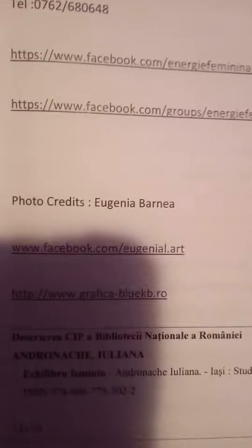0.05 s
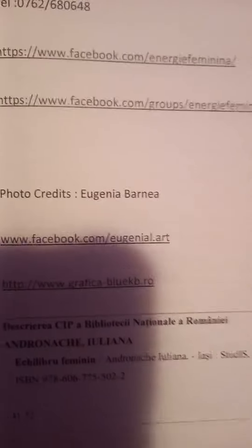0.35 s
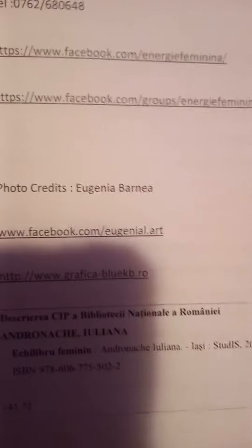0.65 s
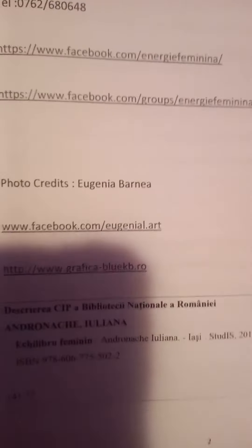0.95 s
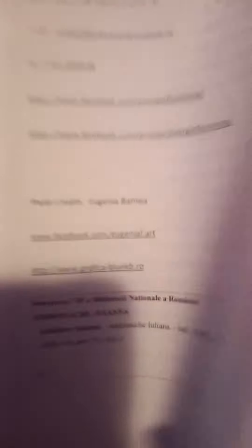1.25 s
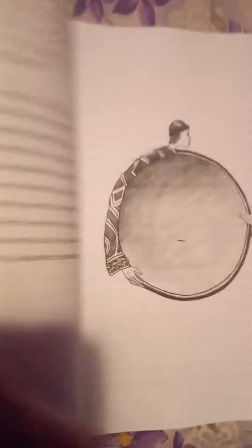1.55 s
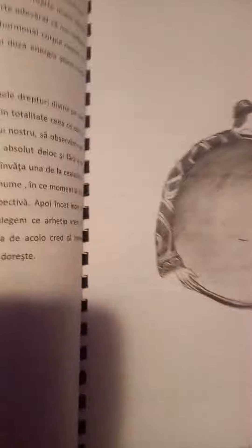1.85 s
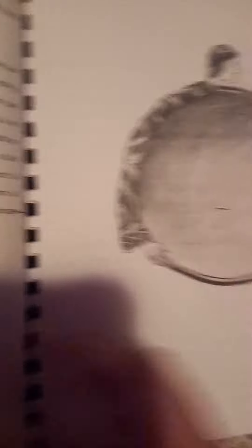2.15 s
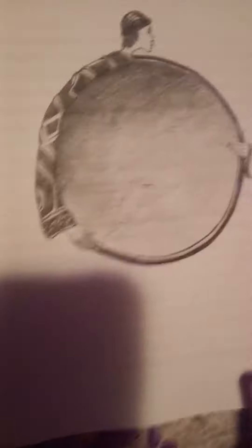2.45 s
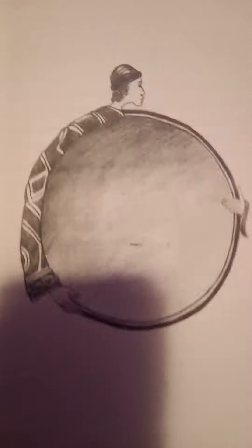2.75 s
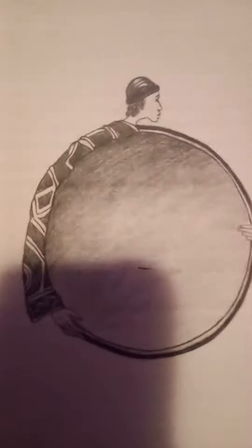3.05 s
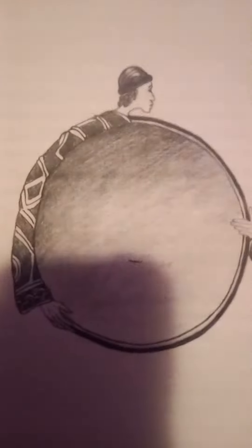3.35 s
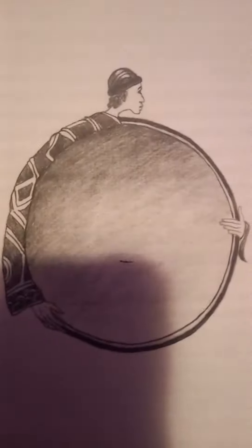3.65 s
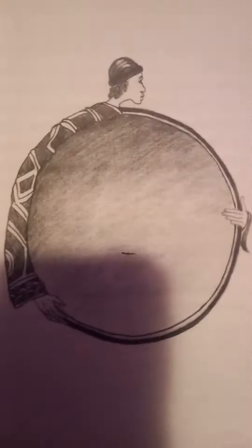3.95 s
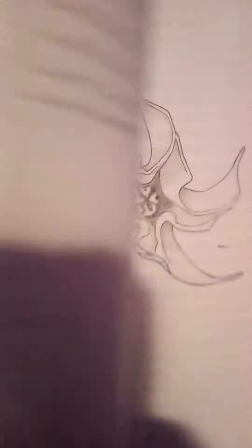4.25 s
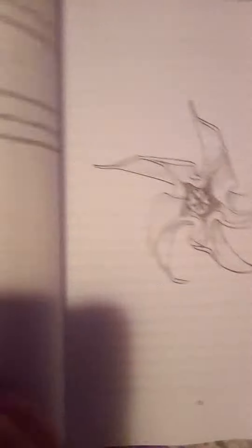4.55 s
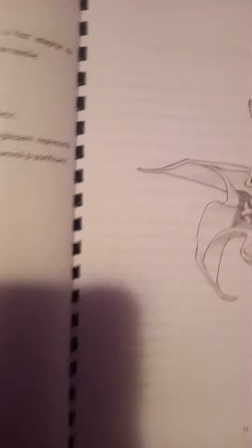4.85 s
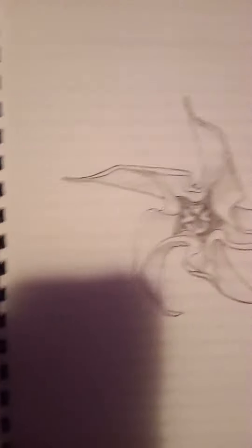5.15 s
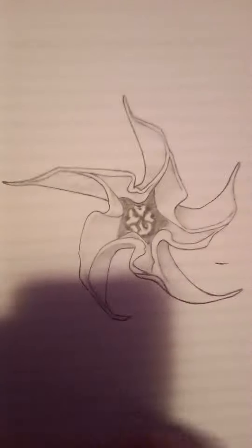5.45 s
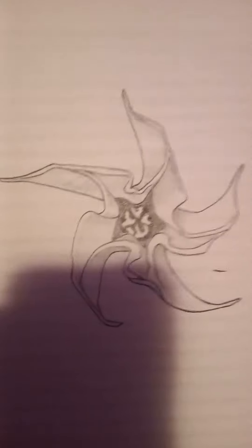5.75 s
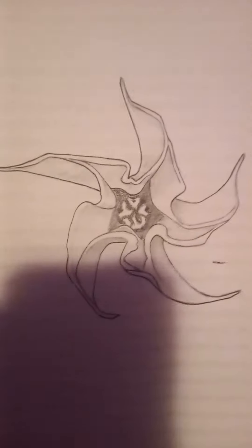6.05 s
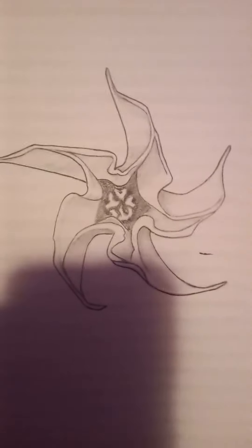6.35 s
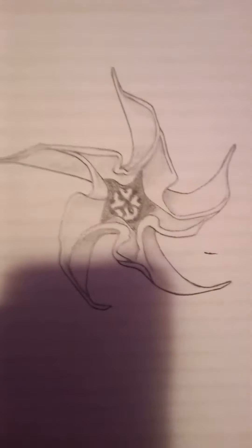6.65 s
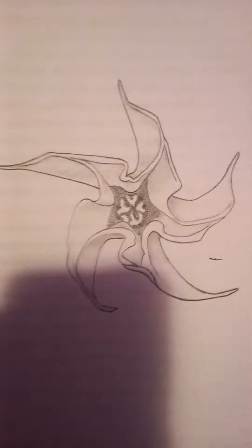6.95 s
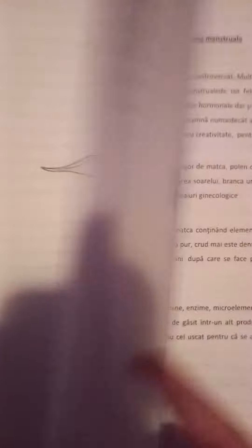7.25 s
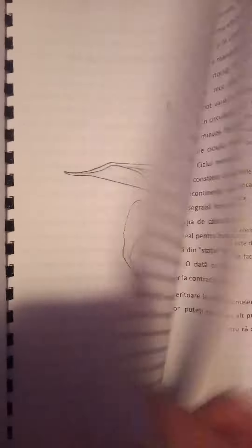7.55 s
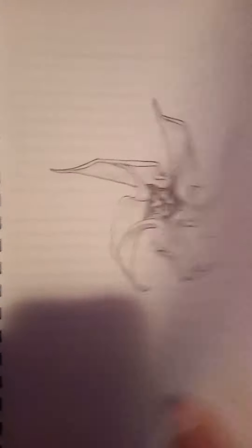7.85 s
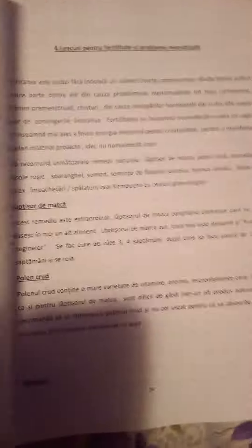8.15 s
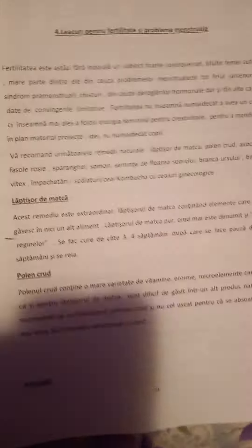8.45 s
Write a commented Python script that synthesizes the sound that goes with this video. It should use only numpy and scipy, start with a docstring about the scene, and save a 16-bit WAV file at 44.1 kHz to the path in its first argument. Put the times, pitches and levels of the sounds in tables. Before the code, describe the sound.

Close rustles, crisp snaps and soft bumps as someone leafs through a bound book in a quiet room, pausing twice.

```python
"""Turning the pages of a comb-bound book

Pages are turned by hand, close to a phone in a small quiet room. Stick-slip friction makes each sheet
hiss as it slides and swish as it bends; it snaps where it buckles or catches on the binding. The air
gap beneath it resonates, and it settles on a cushion of air. Hand and sheet bump the book softly,
exciting its damped modes. Room air, microphone hiss and the hum of a distant appliance lie behind."""
import sys
import numpy as np
from scipy import signal
from scipy.fft import rfft, irfft
from scipy.io import wavfile
from scipy.ndimage import uniform_filter1d, map_coordinates

SR = 44100
rng = np.random.default_rng(int(sys.argv[2]) if len(sys.argv) > 2 else 0)


def store_pcm(level_fs):
    """Save levels as 16-bit WAV."""
    pcm = np.round(np.clip(level_fs, -1, 1) * 32767).astype(np.int16)
    wavfile.write(sys.argv[1], SR, np.atleast_2d(pcm).T)


N = 374850
T = np.arange(N) / SR

# Sliding sheet, one curve a turn: t/s, rubbing level/dB, bend/dB (body that the curved sheet adds)
TURN_CURVES = ([(.55, -50.5, -5), (.68, -49.5, 7), (.78, -51, -1.5), (1.02, -35, -9.5), (1.19, -35, 2),
               (1.28, -42, -0.5), (1.58, -41.5, -4), (1.72, -34.5, 3), (1.86, -35, -7), (1.97, -34, -3.5),
               (2.13, -41, -7), (2.2, -62, 0)], [(3.94, -47.5, -6), (4.02, -42, -5), (4.13, -32.5, -9.5),
               (4.29, -48, -5.5), (4.44, -53.5, 1.5), (4.5, -37.5, -0.5), (4.72, -33, 3), (5.08, -37, -7.5),
               (5.16, -37.5, 1), (5.24, -46, -14), (5.32, -66, -2)], [(6.63, -49, 7), (6.71, -37, -14.5),
               (6.92, -35, -8), (7.11, -30.5, -8), (7.225, -40, -6), (7.28, -27.5, 0.5), (7.52, -35, -2.5)],
               [(7.53, -30.5, -25), (7.62, -31.5, 1), (7.72, -34.5, -7), (7.95, -32.5, -5),
               (8.09, -39.5, -22.5), (8.19, -36.5, 0), (8.387, -33, -3), (8.41, -29.5, 0.5),
               (8.49, -28.5, -9)])
# Quick rubs on paper or skin: t/s of the crest, length/s, level/dB, body/dB, edge/dB
QUICK_RUBS = [(0.255, .1, -50.5, 15.5, -4.5), (0.647, 0.017, -28, -4, 4), (0.933, 0.015, -32.5, 2, -7),
              (.975, 0.017, -28, 6, -3), (1.053, 0.064, -30.5, -21, 7), (1.136, 0.023, -21.5, 5, -1),
              (1.181, 0.038, -23, -4, -27), (1.343, 0.034, -30, 7.5, -5.5), (1.757, .036, -28.5, 9, 1),
              (1.9, 0.028, -20.5, 0, -8), (1.957, .032, -17.5, 10.5, -2.5), (2.28, 0.093, -51, -11, -0.5),
              (3.3, .05, -51, 13, 2), (3.509, 0.072, -51, 13.5, -5), (4.021, 0.034, -20.5, 1.5, 4),
              (4.357, .04, -34, -8, -3), (4.619, 0.037, -29.5, 2, -11), (4.722, 0.023, -24, 1, -7),
              (4.758, 0.026, -19, 2, -1), (4.81, 0.015, -17, 0.5, 1.5), (5.121, 0.028, -25, -7.5, -4.5),
              (6.708, 0.03, -20.5, 2, 2), (6.846, 0.024, -21.5, 7.5, 2.5), (6.978, .02, -20.5, -3, -11.5),
              (7.074, 0.046, -22.5, 4, 0), (7.134, 0.024, -19.5, 6, 7.5), (7.315, 0.021, -15, 3, -2.5),
              (7.345, 0.014, -16, -3, -5.5), (7.387, .042, -23.5, -11, -1), (7.43, .02, -21, -1, -2),
              (7.603, .02, -15, -2, -6.5), (7.782, .02, -21.5, -6, -5.5), (7.896, 0.034, -34, -3, -4),
              (7.961, .03, -27.5, 2.5, 4.5), (8.416, .016, -15, -13, -6), (8.44, 0.022, -12.5, -10.5, -7)]
# Buckles and catches: t/s, level/dB, body/dB, edge/dB, left minus right/dB
BUCKLES = [(.529, -27, 0, 3, 12), (.551, -8.5, -15, 16, 12), (0.556, -18, -20, 10, 5),
           (.563, -9.5, -10, 1, 10), (0.624, -10.5, -21, 4, 10), (0.629, -10, -3, 11, 14),
           (0.646, -8.5, -20, 7, 12), (.654, -10, -20, 13, 7), (.662, -4, -3, 7.5, 11),
           (0.812, -19.5, 0, -5, 1), (.85, -10, -5, -6, 3), (.857, -7, -8.5, -0.5, -1),
           (.868, -3, -4.5, 0, -1), (1.009, 0.5, 1.5, 1.5, -0.5), (1.16, 2, 1, -12, -0.5),
           (1.615, -8.5, 10.5, -3, 1), (1.648, -12, 16, -2, 8.5), (1.678, -7, 8.5, -6, 2),
           (1.717, 4, 6, 2.5, 8.5), (1.887, -0.5, 1, 8, 20), (1.927, -1.5, 9, 8, 3), (2.008, -13, 8, -1, 4),
           (2.06, -13, -7, 8, 14), (2.081, -8, -21, -13.5, 2), (2.102, -14.5, 5.5, -14, 5),
           (2.806, -24, -15, -3, -1), (2.839, -30.5, 6, -15, 2.5), (3.647, -24.5, -10, -13, 3),
           (3.918, -22.5, -12, -2, -1), (3.959, -12, -7.5, -4, -2), (3.97, -10, -13, -1.5, 0),
           (4.104, -2, 7, -5.5, 1), (4.47, -12, -7, 5, 1), (4.524, -4, -4.5, 2, 8),
           (4.564, -2.5, 3.5, -4, 3.5), (4.61, 2, 14, -0.5, 2), (4.694, -6.5, -12, -9, 6),
           (4.72, -0.5, -11, 4, 12), (4.805, -10, 0, 0, -10), (4.856, -8.5, 3.5, 5, 10),
           (4.896, -7.5, -32, -5, 3), (6.472, -32.5, -7, -4, 3), (6.623, -23, -15.5, -3, -1),
           (6.811, -13, 4.5, -1, -1), (6.836, -2, -1, 1, -3), (7.145, -10, -7, 6, 2),
           (7.244, -8.5, -4, -2, -1), (7.257, -7.5, 7, -2, 3), (7.428, -5.5, 3.5, -6, -1),
           (7.593, -12, -8, -5, 7), (7.761, -9.5, 13, -9, 1), (8.203, -11.5, 0, -9, 3),
           (8.228, -0.5, 9.5, 5, 4.5), (8.276, -3, 2, 0.5, 6), (8.335, -0.5, 4.5, 3.5, 8),
           (8.389, -2.5, -23, -10, 2), (8.443, -3, -11, 0, 3)]
# Air gap under a lifting or falling sheet: t/s, length/s, level/dB, first f/Hz, last f/Hz, width/octaves
AIR_GAPS = [(1.156, 0.16, -40, 1510, 1460, .23), (1.708, 0.062, -24.5, 1410, 1650, 0.12),
            (1.907, 0.055, -25.5, 1500, 350, .34), (4.106, 0.032, -31, 546, 296, 0.16),
            (4.318, 0.13, -40.5, 2300, 1700, .2), (4.466, .2, -32, 1850, 1570, .22),
            (4.905, 0.18, -36.5, 1900, 2150, 0.13), (5.123, .03, -28, 2800, 400, 0.45),
            (6.697, 0.5, -34.5, 2220, 2500, 0.17), (6.685, 0.21, -40, 3300, 3030, 0.044),
            (7.04, 0.14, -27.5, 1610, 1440, 0.15), (7.261, 0.3, -33, 1380, 1250, 0.42),
            (7.33, 0.036, -23.5, 1900, 1890, .052), (7.757, .01, -30, 700, 525, 0.44),
            (8.435, 0.063, -26.5, 3620, 3760, 0.1)]
# Soft impacts on the book: t/s, level/dB, upper cutoff f/Hz of the contact
IMPACTS = [(0.149, -31.5, 400), (.665, -22, 400), (0.834, -25, 400), (.895, -23, 400), (1.13, -16, 201),
           (1.158, -15, 300), (1.717, -24, 300), (1.92, -21, 300), (1.951, -15, 400), (2.519, -43, 200),
           (2.838, -40, 400), (4.012, -23, 300), (4.106, -12, 600), (4.118, -12, 450), (4.61, -15, 600),
           (4.82, -25, 200), (5.141, -18.5, 303), (6.485, -33.5, 202), (6.722, -21, 400), (6.848, -19, 700),
           (7.013, -14, 395), (7.26, -17.5, 201), (7.304, -20, 250), (7.677, -20.5, 179),
           (7.761, -16.5, 500), (7.776, -19, 161), (7.841, -26, 180), (7.957, -21, 170), (8.228, -18, 500)]
# Modes of the block of pages on its support: f/Hz, level/dB, t60/s
BOOK_MODES = [(82, -9, .07), (118, -3, .08), (165, -2, .06), (236, -2, .07), (290, -1, .06), (360, 0, .06),
              (450, -2, .05), (620, -7, .04)]
# Spectrum of rustling paper: f/Hz, relative level/dB
PAPER_SPECTRUM = [(30, -36), (70, -4), (130, -5), (400, -0.5), (700, -1.5), (1300, 1.5), (2300, 2),
                  (3500, 0.5), (6300, -1.5), (7900, 2), (9300, -7.5), (13000, -6), (15800, -11.5)]
# Position of the sheet: t/s, left minus right/dB
SHEET_PATH = [(.6, 0), (1., 1.5), (1.9, 2.5), (4.1, .5), (4.7, 2.5), (5.2, 3), (6.8, .5), (7.35, 0),
              (8.4, 3.5)]
# Spectrum of room air and microphone hiss: f/Hz, relative level/dB
FLOOR_SPECTRUM = [(18, -67.5), (30, -62), (59, -17), (120, -1), (169, -7), (447, -11), (483, -11.5),
                  (566, -17.5), (628, -16.5), (735, -17), (1010, -17.5), (1940, -20.5), (2150, -21.5),
                  (9110, -31), (15800, -20.5)]
# Partials of a distant appliance: f/Hz, level/dB
HUM_PARTIALS = [(73, -79), (120, -96), (238, -67.5), (343, -81)]


def slides(patchy_db=3, flex_hz=14, patch_density=9):
    """Sliding friction radiates a grainy hiss, whose broad resonances wander as the sheet flexes."""
    f, t, friction = signal.stft(stick_slip(N, slip_db=2.7, catch_db=2.1), SR, nperseg=512)
    limits_hz = np.array([70, 350, 1500, 5000, 15000])  # four bands: rumble, body, middle, edge
    centres_hz = np.sqrt(limits_hz[:-1] * limits_hz[1:])
    paper = undb(level_at(PAPER_SPECTRUM, f))
    band_power = [np.sum(paper[(f >= lo) & (f < hi)] ** 2) / len(f)
                  for lo, hi in zip(limits_hz, limits_hz[1:])]
    bands_to_bins = np.array([level_at(list(zip(centres_hz, row)), f) for row in np.eye(4)]).T
    gain = 0
    for turn in TURN_CURVES:
        times, rub, bend = np.transpose(turn)
        rub, bend = np.interp(t, times, rub), np.interp(t, times, bend)
        rumble = -22.5 + 0.54 * rub + 0.31 * bend  # displaced air: grows with rubbing and bend
        edge = rub - 1 - 0.21 * bend  # the free edge of a flatter sheet hisses more
        band_db = np.array([rumble, rub + bend, rub, edge]) - 10 * np.log10(band_power)[:, None]
        moving = uniform_filter1d(1. * ((t > times[0]) & (t < times[-1] + .04)), size=7)
        gain = np.maximum(gain, undb(bands_to_bins @ band_db) * moving)
    grid = np.meshgrid(patch_density * np.log2(1 + f / 400), flex_hz * t, indexing="ij")
    flex = map_coordinates(rng.standard_normal((64, 256)), grid, order=1, mode="wrap")
    hiss = signal.istft(friction * gain * paper[:, None] * undb(patchy_db * flex), SR)[1][:, :N]
    return hiss * pan(position_db(T))


def swishes(rise_share=.42):
    """Friction noise grows with sliding speed: the sheet accelerates briefly and slips coarsely."""
    out, t = np.zeros((2, N)), T[:2 ** 14]
    for at, length, db, body_db, edge_db in QUICK_RUBS:
        rise, fall = length * rise_share, length * (1 - rise_share)
        crest = 3 * rise
        exponent = np.where(t < crest, ((t - crest) / rise) ** 2, np.abs((t - crest) / fall) ** 1.6)
        speed = np.exp(-exponent / 2)
        slips = stick_slip(len(t), slip_db=3.2, catch_db=1.3, catch_hz=260)
        rub = unit_rms(sheet_radiation(slips, body_db, edge_db, ripple_db=1.5))
        add(out, at - crest, shadow(rub, position_db(at)) * speed * undb(db))
    return out


def snaps(crack_s=.0018, flap_s=.009, snap_delay_s=.0015,
          ring_hz=1315, ring_octaves=.8, db_per_octave=11):
    """Snap-through buckling emits a pulse; bending waves crackle through the sheet and ring the patch."""
    out, t = np.zeros((2, N)), T[:2 ** 12]
    for at, db, body_db, edge_db, pan_db in BUCKLES + crackles():
        hz = ring_hz * 2 ** (-body_db / db_per_octave)  # a larger buckle has more body and rings lower
        snap = stereo_noise(len(t)) * (.45 * np.exp(-t / crack_s) + .035 * np.exp(-t / flap_s))
        snap[[0, 1], rng.integers(0, 5, size=2)] -= 2  # the pulse has its own delay to each port
        snap = sheet_radiation(snap, body_db, edge_db, ripple_db=3)
        snap = colour(snap, [(70, -16), (260, 5.5)])  # so small a patch radiates little bass
        snap = colour(snap, [(hz / 2 ** ring_octaves, 0), (hz, 3), (hz * 2 ** ring_octaves, 0)])
        snap /= np.abs(snap).max(axis=1, keepdims=True)
        add(out, at + snap_delay_s, shadow(snap, pan_db) * undb(db))
    return out


def crackles(per_turn=12, above_rub_db=12, spread_db=3, colour_db=7, scatter_db=4):
    """Small buckles occur at random and follow the rubbing in strength; rows as in BUCKLES."""
    rows = []
    for turn in TURN_CURVES:
        times, rub, bend = np.transpose(turn)
        onsets = rng.uniform(times[0], times[-1], per_turn)
        for at, (size, body, edge, side) in zip(onsets, rng.standard_normal((per_turn, 4))):
            db = np.interp(at, times, rub) + above_rub_db + spread_db * size
            body_db = np.interp(at, times, bend) + colour_db * body
            rows.append((at, db, body_db, colour_db * edge, position_db(at) + scatter_db * side))
    return rows


def gap_resonances():
    """Cavity resonance: rubbing excites the air under the sheet; the pitch glides as the gap deforms."""
    out, n = np.zeros((2, N)), 2 ** 14
    for at, length, db, first_hz, last_hz, octaves in AIR_GAPS:
        f, t, friction = signal.stft(stick_slip(n, slip_db=4, catch_db=1), SR, nperseg=256)
        centre_hz = first_hz * (last_hz / first_hz) ** np.clip(t / length, 0, 1)
        detuning = np.log2((f[:, None] + 1) / centre_hz) / octaves
        resonance = 1 / (1 + detuning ** 2) / np.sqrt(centre_hz)
        rub = unit_rms(signal.istft(friction * resonance, SR)[1][:, :n])
        swell = np.sqrt(np.abs(np.sin(np.pi * np.clip(T[:n] / length, 0, 1))))
        add(out, at, rub * swell * undb(db) * pan(position_db(at)))
    return out


def bumps(gain_db=-2, scuff_s=.018, thud_s=.0018, detune=.08):
    """Modal response: a push with a short scuff rings the book; soft contact limits the bandwidth."""
    out, t = np.zeros((2, N)), T[:2 ** 13]
    for at, db, cutoff_hz in IMPACTS:
        modes = 0
        for hz, mode_db, t60 in BOOK_MODES:
            hz *= 1 + detune * rng.standard_normal()
            modes += undb(mode_db - 60 * t / t60) * np.cos(2 * np.pi * hz * t)
        force = stereo_noise(len(t)) * (.059 * np.exp(-t / scuff_s) + .24 * np.exp(-t / thud_s))
        force[:, 0] += 2  # impulse of the push
        thud = signal.fftconvolve(force, modes[None])[:, :len(t)]
        thud = signal.sosfilt(signal.butter(2, [65, cutoff_hz], "band", fs=SR, output="sos"), thud)
        add(out, at, thud / np.abs(thud).max() * undb(db + gain_db))
    return out


def stick_slip(n, slip_db, catch_db, slip_hz=1300, catch_hz=130):
    """Stick-slip friction: fibres slip in tiny, clustered jerks that modulate the amplitude of noise."""
    return stereo_noise(n) * unit_rms(undb(slip_db * wander(n, slip_hz) + catch_db * wander(n, catch_hz)))


def sheet_radiation(x, body_db, edge_db, ripple_db):
    """A wide bend radiates body, a free edge treble; each bend has its own uneven resonances."""
    x = colour(x, PAPER_SPECTRUM)
    x = colour(x, [(800, body_db), (2400, 0), (7000, edge_db)])
    ripple = zip(np.geomspace(500, 16000, 110), ripple_db * rng.standard_normal(110))
    return colour(x, list(ripple))


def shadow(x, pan_db):
    """Acoustic shadow: the phone's body screens the far port, but long waves diffract round it."""
    ports_db = 20 * np.log10(unit_rms(pan(pan_db))[:, 0])
    return np.array([colour(port, [(200, 0), (600, db)]) for port, db in zip(x, ports_db)])


def room(x, wet_db=-12, t60_low=.4, t60_high=.28, treble_db=-6, crossover_hz=1500):
    """Reverberation of a furnished room: absorption takes the treble first."""
    t = T[:2 ** 14]
    noise = stereo_noise(len(t))
    low = signal.sosfilt(signal.butter(1, crossover_hz, fs=SR, output="sos"), noise)
    low_decay, high_decay = undb(-60 * t / t60_low), undb(treble_db - 60 * t / t60_high)
    tail = (low * low_decay + (noise - low) * high_decay) * np.clip(t / .002, 0, 1)
    tail /= np.sqrt(np.sum(low_decay ** 2))
    return x + undb(wet_db) * signal.oaconvolve(x, tail, axes=1)[:, :N]


def background(floor_db=-53, waver_rad=.43):
    """Noise floor: broadband room air and microphone hiss, with a faint phase-modulated hum."""
    hum = sum(undb(db) * np.sqrt(2) * np.sin(2 * np.pi * hz * T + waver_rad * wander(N, 20))
              for hz, db in HUM_PARTIALS)
    floor = unit_rms(colour(stereo_noise(N), FLOOR_SPECTRUM))
    return floor * undb(floor_db + .5 * wander(N, 6.3)) + hum


def stereo_noise(n):
    """Spatial coherence: white noise at two ports is alike in the bass, unrelated in the treble."""
    mid, side = rfft(rng.standard_normal((2, n)))
    share = np.clip((np.fft.rfftfreq(n, 1 / SR) / 1150) ** 2 + .27, 0, 1)
    return irfft((mid + share * side * np.array([[1], [-1]])) / np.sqrt(1 + share ** 2), n)


def wander(n, rate_hz):
    """Random modulation: Gaussian values at rate_hz, joined by lines."""
    return np.interp(np.arange(n) * rate_hz / SR, np.arange(n), rng.standard_normal(n))


def colour(x, points):
    """Minimum-phase filter through points (f/Hz, level/dB), built from the folded cepstrum."""
    n = x.shape[-1]
    gain = undb(level_at(points, np.fft.rfftfreq(n, 1 / SR)))
    cepstrum = irfft(np.log(gain), n)
    cepstrum[1:n // 2] *= 2
    cepstrum[n // 2 + 1:] = 0
    return irfft(rfft(x) * np.exp(rfft(cepstrum)), n)


def level_at(points, f):
    """Level/dB of a spectrum, interpolated in log frequency."""
    hz, db = np.transpose(points)
    return np.interp(np.log(f + 1), np.log(hz), db)


def position_db(t):
    """Level difference, left minus right, of the sheet at t/s."""
    return np.interp(t, *np.transpose(SHEET_PATH))


def pan(db):
    """Left and right gains for a level difference."""
    return undb(np.array([db, -db]) / 2).reshape(2, -1)


def undb(db):
    """Amplitude ratio of a level."""
    return 10 ** (np.asarray(db) / 20)


def unit_rms(x):
    """Normalisation to unit power."""
    return x / np.sqrt(np.mean(x ** 2))


def add(out, at, x):
    """Superposition of x on out from time at/s."""
    start = max(int(at * SR), 0)
    part = x[:, :max(N - start, 0)]
    out[:, start:start + part.shape[1]] += part


def scene():
    """Superposition: the sounds of the book reverberate in the room, over its background."""
    return room(slides() + swishes() + snaps() + gap_resonances() + bumps()) + background()


def record(dry, low_hz=54, top_hz=16000):
    """Band limiting and saturation: the phone drops deep bass, rounds off peaks and cuts the top."""
    dry = signal.sosfilt(signal.butter(6, low_hz, "high", fs=SR, output="sos"), dry)
    rounded = dry / (1 + dry ** 4) ** (1 / 4)
    return signal.sosfilt(signal.ellip(12, .2, 90, top_hz, fs=SR, output="sos"), rounded)


dry = scene()
out = record(dry)
store_pcm(out)
```